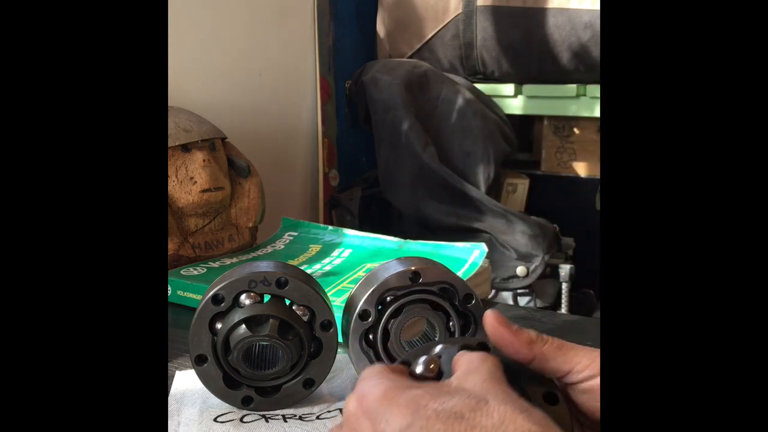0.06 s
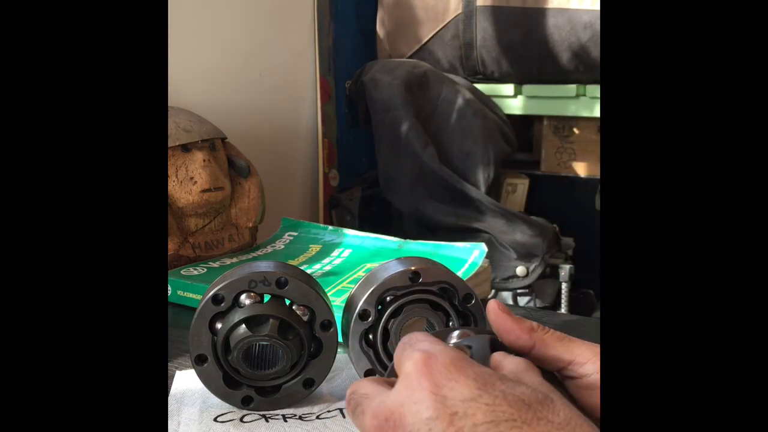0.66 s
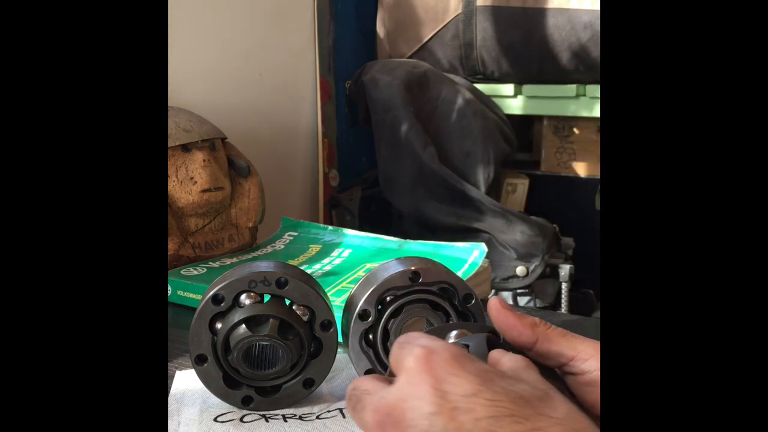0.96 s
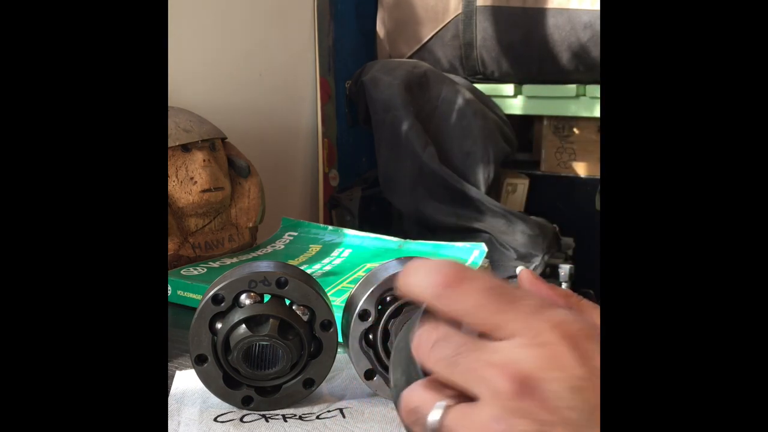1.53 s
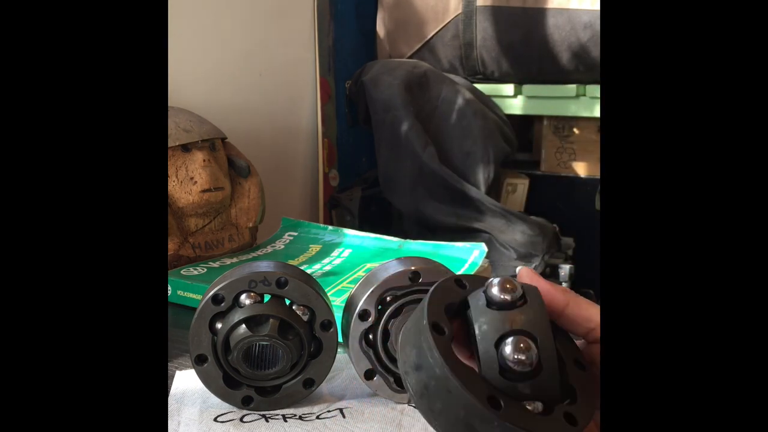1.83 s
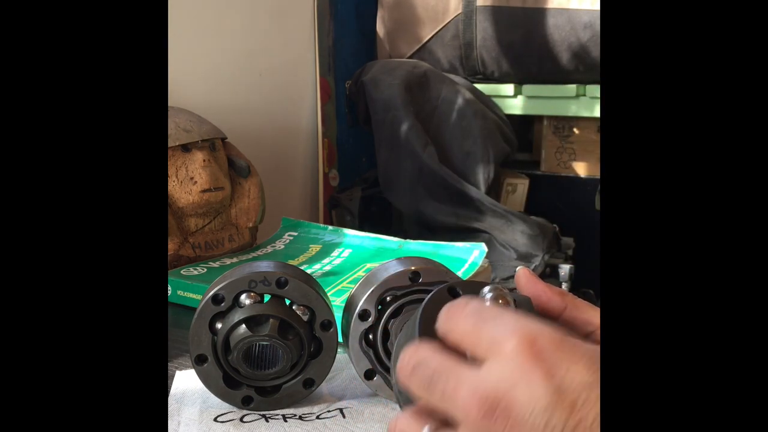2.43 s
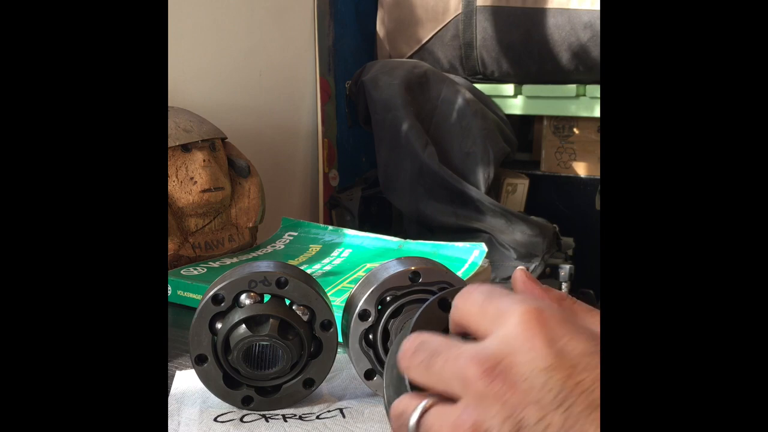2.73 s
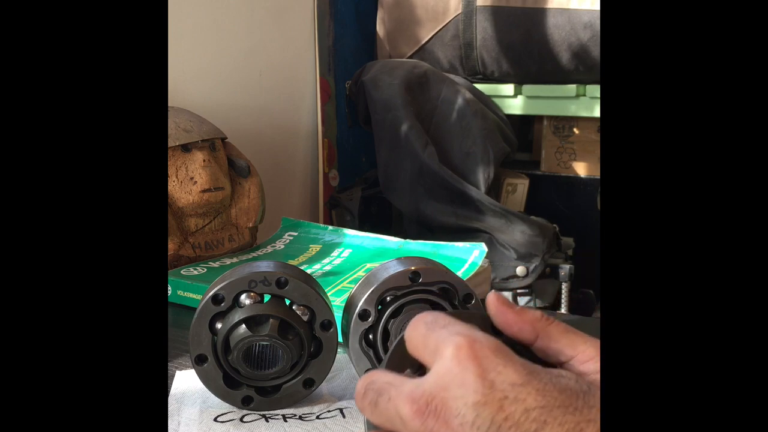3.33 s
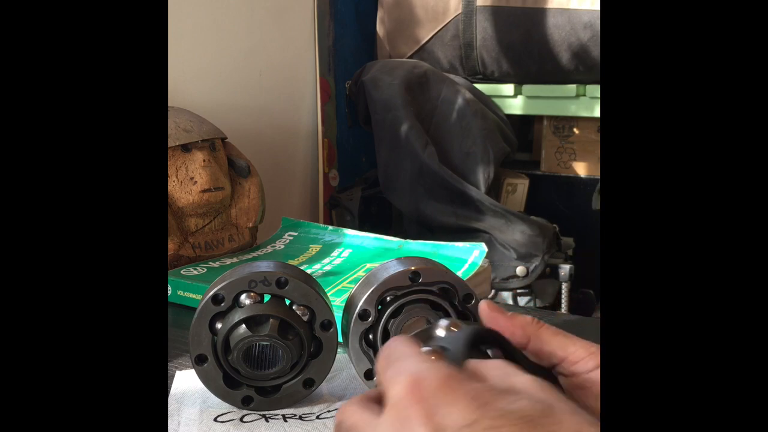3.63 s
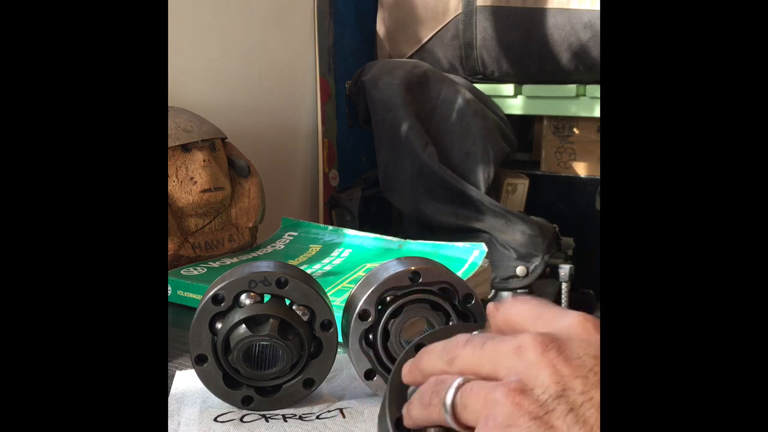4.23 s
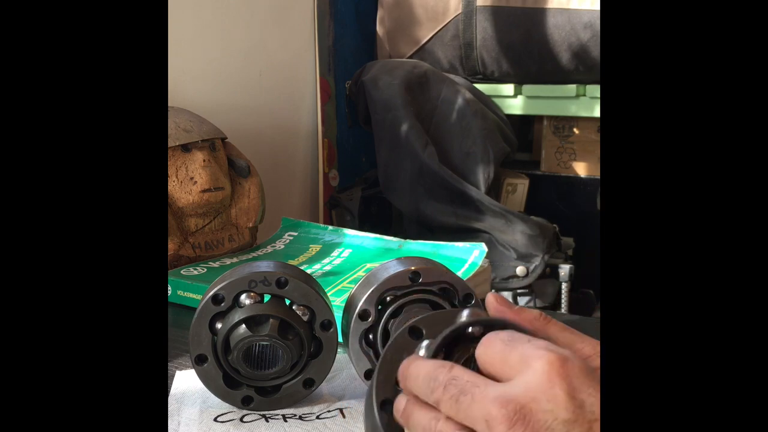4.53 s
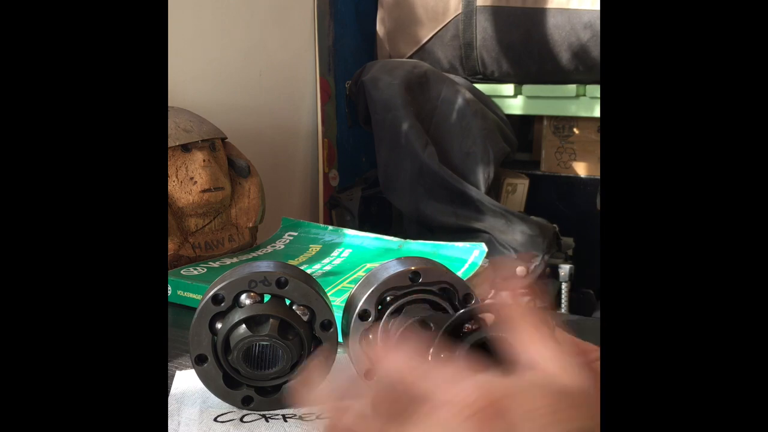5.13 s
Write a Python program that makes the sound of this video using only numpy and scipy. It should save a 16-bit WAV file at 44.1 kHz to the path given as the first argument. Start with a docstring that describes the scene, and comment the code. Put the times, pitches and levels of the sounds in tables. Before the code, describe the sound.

Steel balls clink and clack inside a metal joint twisted by hand, with brief scrapes and a heavy part dragged over paper.

```python
"""A brief scrape of steel and a sharp clack sound over a low hum: a ball joint is twisted by hand.
Its balls slide in their grooves and strike cage and races, whose modes ring briefly under the fingers.
The heavy housing is dragged over a paper-covered workbench, where friction rasps and shakes the bench,
and skin rubs over the steel. A small workshop reflects it all to a close microphone."""
import sys
import numpy as np
from scipy import signal
from scipy.fft import rfft, irfft, next_fast_len
from scipy.io import wavfile

SR = 44100
rng = np.random.default_rng(int(sys.argv[2]) if len(sys.argv) > 2 else 0)


def dump(signal):
    """Clip the signal to [-1, 1] and save it as 16-bit WAV at the path in sys.argv[1]."""
    limited = np.clip(np.atleast_2d(signal).T, -1, 1)
    pcm = np.round(limited * 32767).astype(np.int16)
    wavfile.write(sys.argv[1], SR, pcm)


N = 233333

# spectrum of still workshop air: f/Hz, level/dB
AIR_SPECTRUM = [(15, -35.5), (25, -7), (70, -0.5), (195, -10), (285, -14), (354, -20.5), (624, -22),
                (1260, -25), (1560, -27.5), (2760, -34), (4140, -39.5), (4490, -42), (10100, -47),
                (11900, -49), (16000, -55)]
# strokes of steel on steel: peak t/s, rise/s, fall/s, then hiss/dB, race/dB, cage/dB before trims
STROKES = [(0.012, 0.035, 0.0254, -56, -46, -67.5), (0.086, .02, 0.0044, -46, -51.5, -68.5),
           (0.699, 0.068, 0.0307, -63, -55.5, -68.5), (0.942, .05, 0.024, -67.5, -64.5, -95),
           (1.526, .08, .02, -66, -58, -70.5), (2.724, .05, 0.0133, -78.5, -62.5, -79),
           (3.062, 0.184, 0.0724, -61.5, -73.5, -59.5), (3.195, .045, .015, -64.5, -59.5, -69.5),
           (4.597, 0.0875, 0.017, -54.5, -47.5, -64.5), (5.085, .09, 0.018, -66, -65.5, -66.5)]
# spectrum of sliding steel: f/Hz, level/dB
HISS_SPECTRUM = [(1000, -4.5), (3000, -6.5), (5000, 4.5), (6500, -17), (9500, 4.5), (10400, -7.5),
                 (11400, -1), (15000, -8), (17000, 4.5)]
# modes of the loose parts: f/Hz
LOOSE_MODES_HZ = [1610, 1950, 2150, 2400, 2690, 3080, 3260, 3470, 3730, 4400, 4680, 5520, 5830, 6450, 6850,
                  6965, 7660, 8220, 8500, 9050, 9470, 9620, 11200, 11400, 12870, 14110, 14235, 14420, 15650]
# ball impacts, before trims and grip: t/s, knock/dB, treble/dB re knock, outer race/dB, race t60/s,
# cage/dB re knock, hub/dB re knock
IMPACTS = [(0.0349, -55, -9, -59, .2, -8, -12), (0.051, -43, 0.5, -60.5, 0.24, -27, -39),
           (0.0888, -20, -1, -12, 0.0437, -15.5, 3), (0.104, -37.5, -7.5, -30, .17, -8.5, -11.5),
           (0.7, -64.5, -16.5, -48, 0.0707, -26, -27), (0.7907, -66, -5.5, -44.5, 0.0351, -29, -31.5),
           (1.072, -56.5, -9.5, -43.5, 0.0613, -9, -17.5), (1.223, -49, -4.5, -49, 0.146, -12, -15),
           (1.2374, -41.5, -7.5, -32.5, 0.089, -11, -33), (1.543, -43.5, -11, -52, 0.13, -21, -24.5),
           (1.7054, -45, -14, -36.5, 0.0647, -7, -33.5), (2.7374, -57.5, -14.5, -51, 0.078, -14.5, -29.5),
           (2.8806, -60, -5, -68.5, .1, -31, -16.5), (2.9251, -44.5, -35, -36, 0.04, -22.5, -33),
           (2.9441, -38, -7, -30, 0.0217, -33.5, -23), (3.2078, -58, -22.5, -62.5, 0.085, -19.5, -30),
           (3.4843, -56.5, -9.5, -48.5, .25, -1, 1), (3.4973, -36, -6.5, -40.5, 0.39, -22.5, -17.5),
           (3.509, -44, -15.5, -37.5, .15, -20.5, -31), (3.536, -47.5, -2.5, -43, 0.038, -9, -8.5),
           (3.729, -27, -6.5, -31, 0.293, -17.5, -9.5), (3.7894, -27, 1.5, -27.5, 0.133, -16, -29),
           (3.8181, -48, -21.5, -45, 0.38, 1, -30), (3.8642, -35.5, -2, -46, 0.41, 3, -25.5),
           (3.943, -37, 4, -20.5, 0.0764, -24.5, -20), (3.9491, -21.5, 0, -32, 0.081, -10.5, -10.5),
           (4.0153, -23.5, -0.5, -21, 0.055, -4, -12.5), (4.04, -40.5, -5.5, -39.5, 0.273, -27.5, -29),
           (4.154, -44.5, -10, -45, 0.106, -29, -25), (4.1717, -46, -11.5, -44, 0.079, -10, -29.5),
           (4.232, -54.5, -17, -81.5, 0.194, -38, -23.5), (4.3182, -44, -15, -44, 0.043, -15.5, -29.5),
           (4.369, -58.5, -20, -51, 0.041, -32.5, -35), (4.605, -38.5, -14.5, -45, 0.237, -22.5, -14.5),
           (4.61, -36, -0.5, -41, 0.276, -24, -7), (4.615, -45.5, -16.5, -37.5, 0.251, -34.5, -34.5),
           (4.707, -44.5, -7, -62.5, 0.28, -13.5, -26), (4.7504, -38, 0, -49.5, 0.22, -6.5, -3.5),
           (4.7942, -43, -8, -50.5, 0.363, -29, -28.5), (5.1103, -27.5, 0.5, -18.5, 0.053, -5.5, -10.5),
           (5.1584, -46, -8, -67, .18, -35.5, -33.5)]
# spectrum of a steel knock: f/Hz, level/dB
KNOCK_SPECTRUM = [(150, -25), (550, -3.5), (1000, 6), (2200, 7), (3300, 4.5), (4000, 1), (4900, -0.5),
                  (6200, 2), (9600, 0), (10300, -3), (11300, 1), (13300, -5.5), (14400, 0), (16000, -11)]
# loss of bass in harder knocks: knock/dB, bass gain/dB
BASS_THINNING = [(-60, 0.5), (-52.5, -1.5), (-45, -7), (-27.5, -9.5), (-17.5, -22)]
# modes of the outer race: frequency ratio, level/dB, t60 ratio
RACE_MODES = [(1, 0, 1), (1.012, -17, 1.2), (1.034, -17, .6)]
# modes of the cage, the inner hub and its splined bore: f/Hz, level/dB, t60/s
CAGE_MODES = [(6020, 0, .13), (6165, -12, .08), (14420, -10.5, .09)]
HUB_MODES = [(8939, -2, .12), (9470, -14, .07)]
BORE_MODES = [(12678, 0, .1), (14233, -10, .15)]
# spans in which the balls jostle loosely: from t/s, to t/s
JOSTLE_SPANS = [(0.64, 0.684), (1.59, 1.692), (3.545, 3.535), (4.05, 4.2), (4.91, 5.433)]
# drag of the housing, one curve a pull: t/s, level/dB
PULL_CURVES = [
    [(0.968, -55), (0.978, -46.5), (1.054, -55.5), (1.09, -52), (1.114, -66), (1.168, -57.5), (1.2, -73.5)],
    [(1.95, -77), (1.966, -59.5), (1.976, -55.5), (2.012, -55.5), (2.056, -42.5), (2.1, -51), (2.19, -60.5)],
    [(2.19, -59), (2.198, -68.5), (2.21, -47.5), (2.25, -40.5), (2.306, -50.5), (2.326, -36),
     (2.354, -44.5), (2.61, -73.5), (2.62, -74)],
]
# shares of paper and bench, one row a pull: rasp gain/dB, rumble gain/dB
PULL_SPLIT = [(-11.5, 3), (0.5, -.5), (1, -3.5)]
# spectra of the rasping paper and the shaken bench: f/Hz, level/dB
PAPER_SPECTRUM = [(410, -65), (700, -5), (970, -13.5), (1060, -4.5), (1580, -1.5), (1700, -1), (1960, 2.5),
                  (2450, -0.5), (3030, -8), (3350, -3.5), (4820, -17), (6940, -27), (14000, -49.5)]
BENCH_SPECTRUM = [(76, -27.5), (130, -1), (200, 0), (373, -9), (426, -9.5), (703, -12), (937, -10.5),
                  (1060, -23), (1500, -21), (1950, -25), (3300, -120)]
# fingers rubbing the housing: t/s, level/dB before trim
RUB_CURVE = [(1.27, -66), (1.35, -62.5), (1.365, -53), (1.39, -60), (1.43, -57), (1.48, -69), (1.55, -55.5)]
# spectrum of skin on steel: f/Hz, level/dB
SKIN_SPECTRUM = [(800, -1.5), (2400, 10), (4000, 6), (7000, -3.5), (9500, -11), (12000, -24.5),
                 (16000, -35.5)]
# reverberation time of the workshop: f/Hz, t60/s
ROOM_DECAY = [(200, 0.34), (1000, 0.52), (4000, 0.61), (8000, 0.3), (15000, 0.09)]

RACE_HZ, FIRM_DB = 4015.3, -34  # the outer race ringing freely; a knock of middling strength


def gain_of(db):
    """Amplitude ratio of a level in decibels."""
    return np.exp(np.asarray(db) * np.log(10) / 20)


def unit_rms(x):
    """Normalisation to rms 1."""
    return x / np.sqrt(np.mean(x ** 2) + 1e-20)


def value_at(points, hz):
    """Interpolation on a log-frequency axis."""
    f, value = np.transpose(points)
    return np.interp(np.log(hz + 1), np.log(f + 1), value)


def coloured(x, spectrum):
    """Spectral shaping by a curve in dB, to rms 1."""
    size = next_fast_len(len(x), True)
    gain = gain_of(value_at(spectrum, np.fft.rfftfreq(size, 1 / SR)))
    return unit_rms(irfft(rfft(x, size) * gain, size)[:len(x)])


def envelope(curve):
    """Amplitude envelope through points of t/s, level/dB, silent outside them."""
    s, db = np.transpose(curve)
    out = np.zeros(N)
    n = np.arange(max(round(s[0] * SR), 0), min(round(s[-1] * SR), N))
    out[n] = gain_of(np.interp(n / SR, s, db))
    return out


def add(mix, s, sound):
    """Superposition of a sound starting at time s."""
    part = mix[max(round(s * SR), 0):][:len(sound)]
    part += sound[:len(part)]


def resonate(x, hz, width_hz):
    """Forced response of one damped resonator, to rms 1."""
    r = np.exp(-np.pi * width_hz / SR)
    return unit_rms(signal.lfilter([1, 0, -1], [1, -2 * r * np.cos(2 * np.pi * hz / SR), r * r], x))


def air_and_hum(air_db=-54, hum_db=-56, hum_hz=65):
    """Broadband noise of still air, and a hum that wavers as narrow-band noise does."""
    air = coloured(rng.standard_normal(N), AIR_SPECTRUM)
    band = resonate(rng.standard_normal(N), hum_hz, width_hz=16)
    hum = resonate(band, hum_hz, width_hz=16)
    return gain_of(air_db) * air + gain_of(hum_db) * hum


def swell(peak_s, rise_s, fall_s, depth_db=29):
    """Friction grows with pressure: a stroke gains depth_db per rise_s, then loses it per fall_s."""
    t = np.arange(N) / SR - peak_s
    away = np.maximum(-t / rise_s, t / fall_s)
    return gain_of(-depth_db * np.minimum(away, 2)) * (away < 2)


def friction(per_s, spread_db):
    """Stick-slip friction: tiny slips at random moments, a few of them large."""
    strength = gain_of(spread_db * np.minimum(rng.exponential(1, N), 4)) * rng.standard_normal(N)
    return unit_rms(strength * (rng.random(N) < per_s / SR))


def jingle(t60, size, spread_db=4, detune=0.018):
    """Modal superposition: the loose parts ring together; mix and pitch depend on where they touch."""
    t = np.arange(size) / SR
    loudness, shift, phase = rng.standard_normal((3, len(LOOSE_MODES_HZ)))
    waves = np.sin(2 * np.pi * (np.outer(LOOSE_MODES_HZ * (1 + detune * shift), t) + phase[:, None]))
    return unit_rms(gain_of(spread_db * loudness) @ waves) * gain_of(-60 * t / t60)


def sliding_balls(hiss_trim_db=-1, race_trim_db=-2, cage_trim_db=-3):
    """Frictional excitation: fine slips hiss and shake loose parts, coarser ones drive race and cage."""
    hiss, race, cage = sum(gain_of(stroke[3:])[:, None] * swell(*stroke[:3]) for stroke in STROKES)
    slips, catches = friction(per_s=6000, spread_db=2), friction(per_s=700, spread_db=2)
    shaken = unit_rms(signal.fftconvolve(slips, jingle(t60=0.0126, size=2048))[:N])
    out = gain_of(hiss_trim_db) * hiss * coloured(slips + gain_of(4) * shaken, HISS_SPECTRUM)
    out += gain_of(race_trim_db) * race * resonate(catches, RACE_HZ, width_hz=60)
    return out + gain_of(cage_trim_db) * cage * resonate(catches, CAGE_MODES[0][0], width_hz=50)


def knock(bass_db, treble_db, crack_t60=.014, chatter_db=-20, chatter_t60=.03, jingle_db=-15,
          rebound_db=-15):
    """Impulsive excitation: a crack, three rebounds, dying chatter and the jingle of loose parts."""
    size = 4096
    t, hz = np.arange(size) / SR, np.fft.rfftfreq(2 * size, 1 / SR)
    force = gain_of(-60 * t / crack_t60) + gain_of(chatter_db - 60 * t / chatter_t60)
    for at in np.cumsum(rng.uniform(0.0019, 0.0071, size=3)):  # later rebounds are weaker
        force += (t > at) * gain_of(rebound_db - 60 * at / .15 - 60 * abs(t - at) / 0.0066)
    burst = rng.choice([-1., 1.], size) * force + gain_of(jingle_db) * jingle(t60=0.11, size=size)
    shelves = [(2400, bass_db), (4400, 0), (9000, 0), (11000, treble_db)]
    colour_db = value_at(KNOCK_SPECTRUM, hz) + value_at(shelves, hz)
    log_gain = np.log(gain_of(np.concatenate([colour_db, colour_db[-2:0:-1]])))
    minimum_phase = np.exp(np.conj(signal.hilbert(log_gain)))[:size + 1]  # no sound before the contact
    return gain_of(9.5) * irfft(rfft(burst, 2 * size) * minimum_phase)


def knocking_balls(impacts, treble_trim_per_db=-0.0779):
    """Impact of balls on cage and race: harder knocks are thinner in bass, with slightly trimmed treble."""
    out = np.zeros(N)
    for s, knock_db, treble_db, *_ in impacts:
        bass_db = np.interp(knock_db, *np.transpose(BASS_THINNING))
        treble_db += treble_trim_per_db * (knock_db - FIRM_DB)
        add(out, s, gain_of(knock_db) * knock(bass_db, treble_db))
    return out


def ring(modes, rise_s=0.00015):
    """Free vibration: each mode decays exponentially from a random phase."""
    t = np.arange(SR // 5) / SR
    tone = sum(gain_of(db - 60 * t / t60) * np.sin(2 * np.pi * (hz * t + rng.random()))
               for hz, db, t60 in modes)
    return np.sqrt(2) * tone * (1 - np.exp(-t / rise_s))


def ringing_parts(impacts, race_trim_db=1, grip=0.85, light_db=-30, press_hz_per_db=4, press_t60=.11):
    """Damped natural modes: each knock rings race, cage, hub and bore; the grip damps the race."""
    out = np.zeros(N)
    for s, knock_db, _, race_db, race_t60, cage_db, hub_db in impacts:
        # a light ball that stays pressed on the race damps it and raises its pitch
        pressed = np.exp(-race_t60 / press_t60)
        race_hz = RACE_HZ + press_hz_per_db * max(light_db - knock_db, 0) * pressed
        race = [(race_hz * ratio, db, grip * race_t60 * hold) for ratio, db, hold in RACE_MODES]
        # the bore rings with the hub, more so the harder the knock
        bore_db = hub_db - 13.5 + 0.918 * (knock_db - FIRM_DB)
        add(out, s, gain_of(race_db + race_trim_db) * ring(race))
        add(out, s, gain_of(knock_db + cage_db) * ring(CAGE_MODES))
        add(out, s, gain_of(knock_db + hub_db) * ring(HUB_MODES))
        add(out, s, gain_of(knock_db + bore_db) * ring(BORE_MODES))
    return out


def jostling_balls(per_s=36, knock_db=-67.5, treble_db=-6.5, race_db=-59.5, race_t60=.123, parts_db=-25):
    """Random collisions of loose balls: faint clinks, at least one a span, as rows like IMPACTS."""
    rows = []
    for start, end in JOSTLE_SPANS:
        count = max(round((end - start) * per_s), 1)
        for k in range(count):
            s = start + (end - start) * (k + rng.random()) / count
            rows.append((s, knock_db, treble_db, race_db, race_t60, parts_db, parts_db))
    return rows


def dragged_housing(rasp_trim_db=-1.5, rumble_trim_db=-2, pivot_db=-48, growth=1.092):
    """Friction and forced vibration: the housing rasps over paper fibres and shakes the bench."""
    rasp, rumble = sum(gain_of(shares)[:, None] * envelope(pull)
                       for pull, shares in zip(PULL_CURVES, PULL_SPLIT))
    rumble = gain_of(pivot_db) * (rumble / gain_of(pivot_db)) ** growth  # grows faster than the pull
    fibres = coloured(friction(per_s=7200, spread_db=1.5), PAPER_SPECTRUM)
    bumps = coloured(rng.standard_normal(N), BENCH_SPECTRUM)
    return gain_of(rasp_trim_db) * rasp * fibres + gain_of(rumble_trim_db) * rumble * bumps


def rubbing_fingers(trim_db=-1):
    """Stick-slip friction of skin on steel gives a dull hiss."""
    hiss = coloured(friction(per_s=7600, spread_db=2.5), SKIN_SPECTRUM)
    return gain_of(trim_db) * envelope(RUB_CURVE) * hiss


def workshop(x, early_db=-11, early_t60=0.098, late_db=-14, gap_s=0.0023):
    """Reverberation: dense reflections from bench and clutter, then a frequency-dependent decay."""
    size = SR * 2 // 3
    n = np.arange(size)
    taps = rng.choice([-1., 1.], size) * (rng.random(size) < 1 / 8) * (n > gap_s * SR)
    hz, t, spectra = signal.stft(taps, SR, nperseg=256)
    decay = gain_of(-60 * t / value_at(ROOM_DECAY, hz)[:, None])
    late = signal.istft(spectra * decay, SR, nperseg=256)[1][:size]
    early = rng.standard_normal(size) * abs(taps) * gain_of(-60 * n / SR / early_t60)
    response = gain_of(early_db) * early / np.linalg.norm(early)
    response += gain_of(late_db) * late / np.linalg.norm(late)
    return signal.fftconvolve(x, response)[:N]


def scene(ring_wet_db=-3, paper_wet_db=4):
    """Direct and reflected sound add at one microphone; hands shield the ringing parts from the room."""
    impacts = IMPACTS + jostling_balls()
    steel = sliding_balls() + knocking_balls(impacts) + rubbing_fingers()
    tones = ringing_parts(impacts)
    paper = dragged_housing()
    echo = workshop(steel + gain_of(ring_wet_db) * tones + gain_of(paper_wet_db) * paper)
    return (air_and_hum() + steel + tones + paper + echo)[None]


def record(dry, threshold_db=-15, hold_s=0.3986, hiss_db=-67, low_cut_hz=36, high_cut_hz=16100):
    """Gain ranging: a loud peak briefly switches the recorder to a hissier range; band limits follow."""
    n = np.arange(N)
    last_peak = np.maximum.accumulate(np.where(abs(dry[0]) > gain_of(threshold_db), n, -N))
    hiss = coloured(rng.standard_normal(N), [(2000, -0.5), (8000, -2.5), (12000, -3), (16000, -9)])
    hiss *= gain_of(hiss_db) * (n - last_peak < hold_s * SR)
    sound = signal.sosfilt(signal.butter(2, low_cut_hz, "high", fs=SR, output="sos"), dry + hiss)
    clipped = np.clip(sound, -.75, .75)  # only the hardest crack can overload the input
    low_pass = signal.firwin(161, high_cut_hz, window=("kaiser", 8), fs=SR)
    return signal.oaconvolve(clipped, low_pass[None], "same")


dry = scene()
out = record(dry)
dump(out)
```